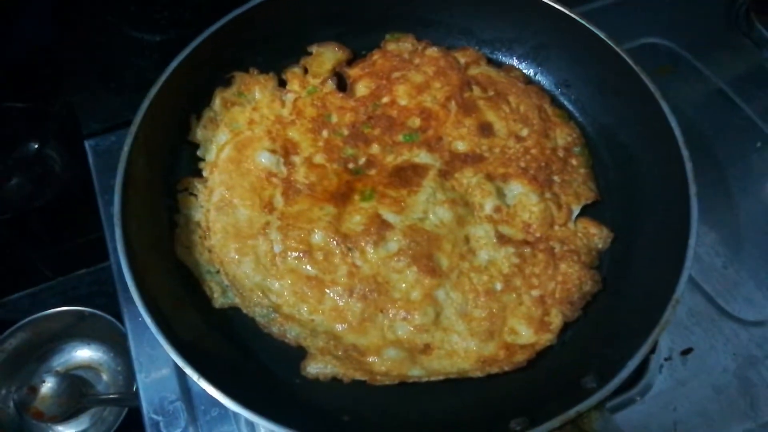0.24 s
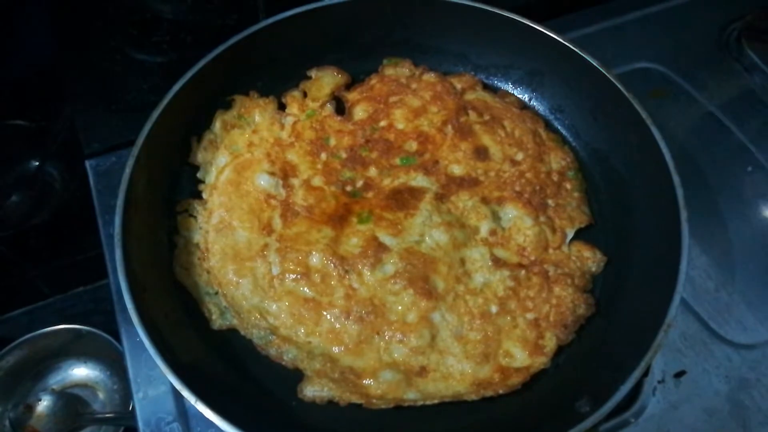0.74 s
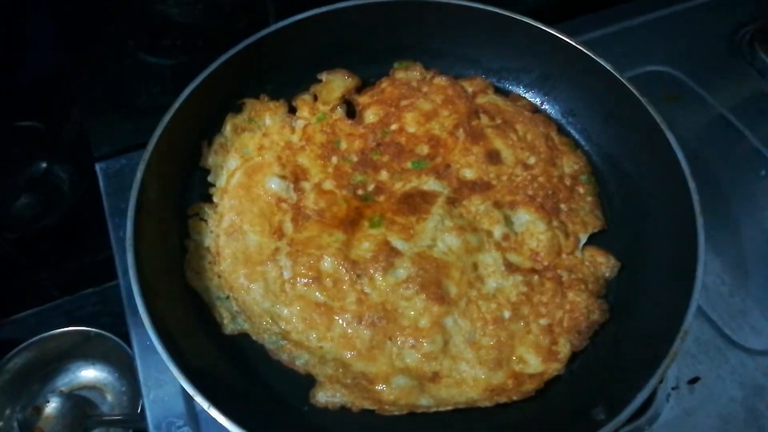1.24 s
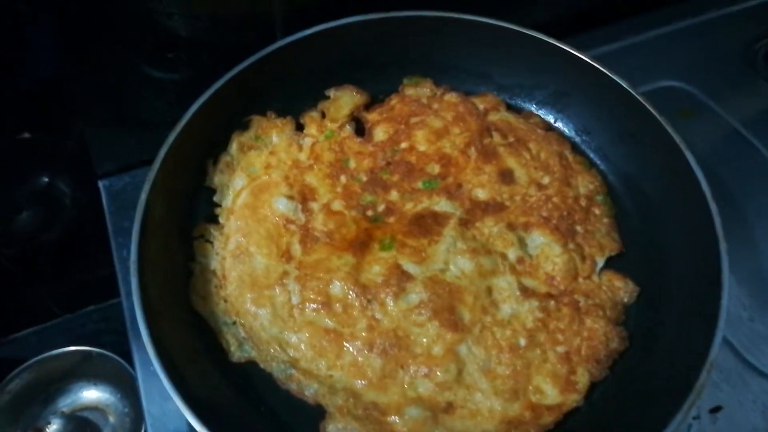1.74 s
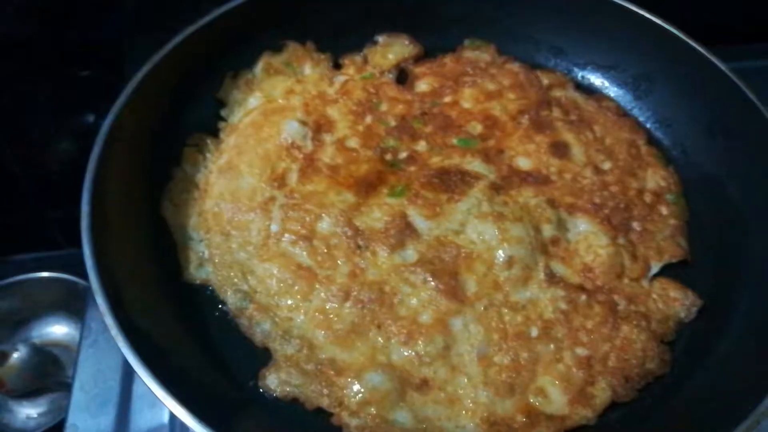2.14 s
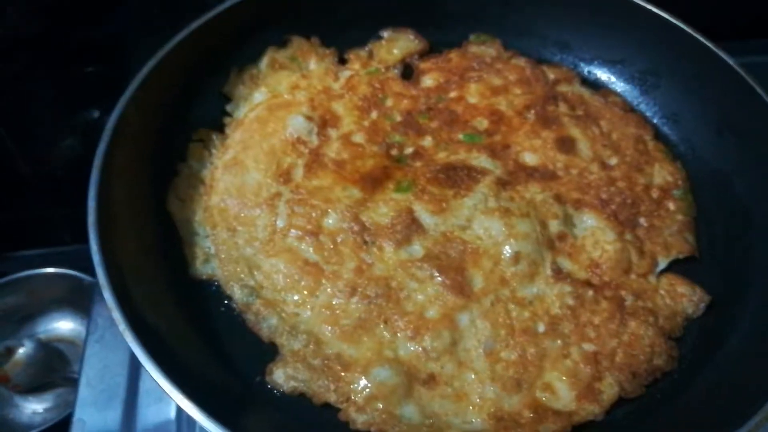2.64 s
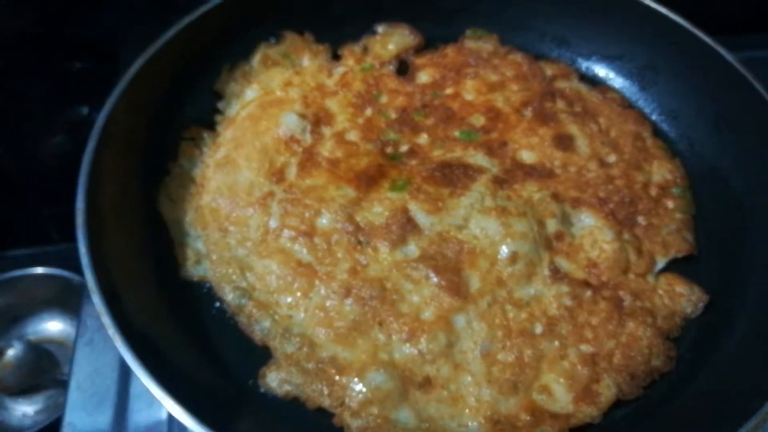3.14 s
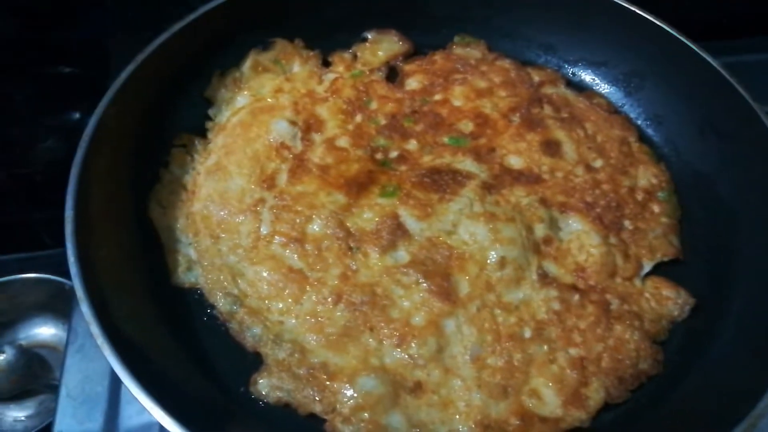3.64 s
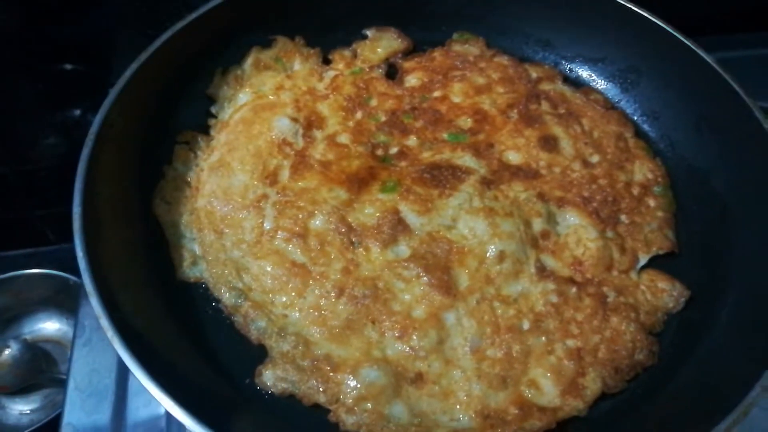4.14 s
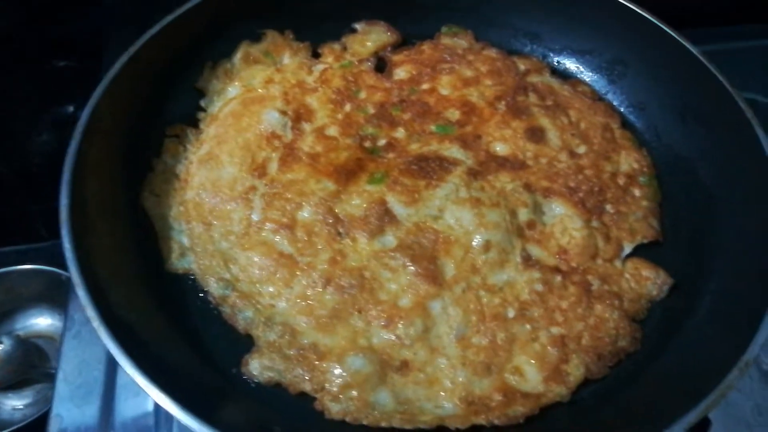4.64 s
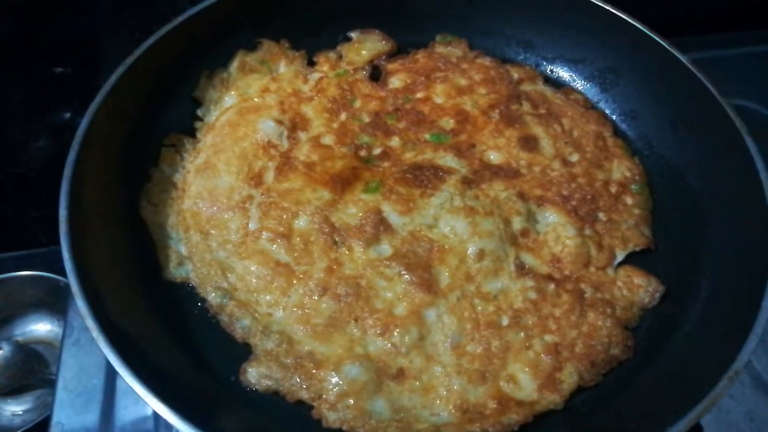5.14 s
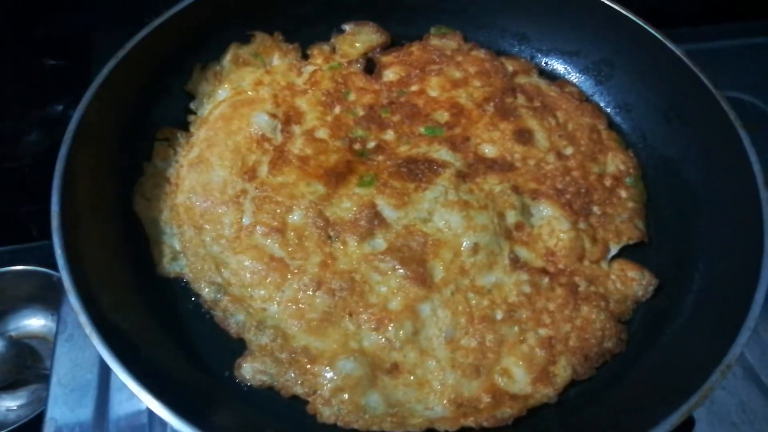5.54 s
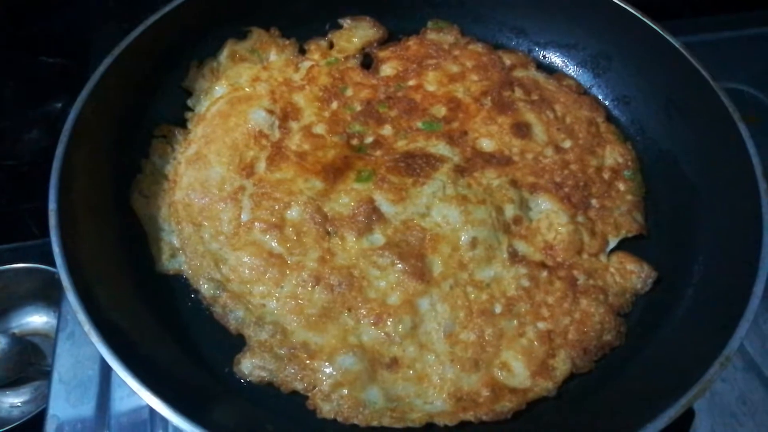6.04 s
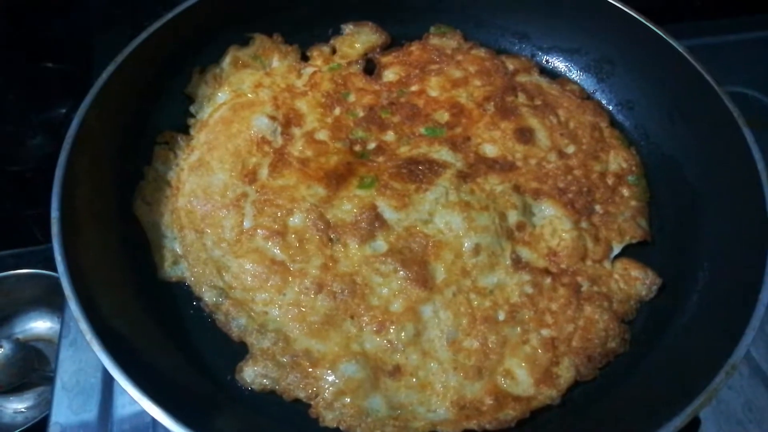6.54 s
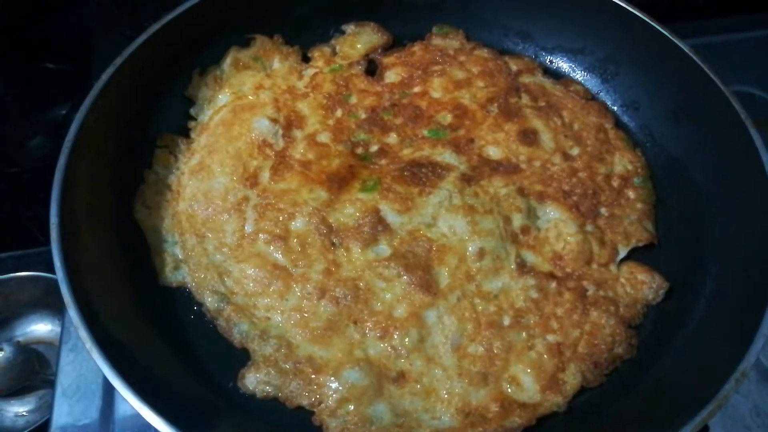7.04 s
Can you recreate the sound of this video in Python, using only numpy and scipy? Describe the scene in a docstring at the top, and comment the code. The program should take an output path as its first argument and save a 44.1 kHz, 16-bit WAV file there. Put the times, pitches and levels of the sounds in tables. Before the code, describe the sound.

An omelette sizzles and crackles steadily in hot oil, with an early metallic pan knock, sharp oil pops and later handling bumps.

```python
"""An omelette sizzles and pops in a pan of oil, close to a hand-held phone with two microphone ports. The
sizzle is noise plus random clicks; each pop is one sharp swing of pressure and a short splash. A hand over the
right port colours the sizzle with changing resonances and a gliding notch. Early on another pan nearby knocks
and grates on the stove, as ringing modes and noise. Later the fingers rub and bump the case, as shaped noise
and short low swings. Under it all lies a low rumble."""
import sys
import numpy as np
from scipy import signal
from scipy.fft import rfft, irfft
from scipy.io import wavfile

SR = 44100
rng = np.random.default_rng(int(sys.argv[2]) if len(sys.argv) > 2 else 0)


def unload_wav(signal):
    """Save mono or channel-first audio to the path in sys.argv[1] as 16-bit WAV at rate SR, clipped to [-1, 1]."""
    wavfile.write(
        sys.argv[1],
        SR,
        np.round(np.clip(np.atleast_2d(signal).T, -1, 1) * 32767).astype(np.int16),
    )


N = 321475
TIME = np.arange(N) / SR  # s

# fingers slide on the case: (start [s], length [s], level [dB])
RUBS = [(1.083, 0.094, -61), (1.38, 0.095, -73), (1.725, 0.15, -73), (2.264, 0.074, -59),
        (2.437, 0.057, -59), (3.124, 0.11, -57), (4.547, 0.077, -46), (4.588, 0.012, -39),
        (4.593, 0.059, -46.5), (4.614, 0.12, -47.5), (4.736, 0.19, -57)]

# ways the hand lies over the right port:
# (leak [dB], sharpness Q, five resonances of its hollow as (frequency [Hz], level [dB]))
LOOSE = (-3, 1.17, [(1390, -6), (4280, 5), (7600, 8.5), (10500, -10), (14500, 8)])
HOVERING = (-1.3, 1.06, [(1750, 4), (4600, 0), (5700, 9), (10800, 13.5), (15200, 8)])
CLOSING = (0.59, 1.67, [(1880, 7.5), (4600, 7.5), (6800, 3.5), (10000, 6), (14900, 17)])
CUPPED = (2.2, 2.25, [(2110, 6.7), (3400, 19.27), (8350, 21.07), (11400, 11.6), (14000, 4.8)])
PRESSED = (-6.5, 2.33, [(1400, -17), (1750, -29), (5250, 3.5), (7700, 5.5), (14000, 9.5)])
NARROWED = (0.5, 2, [(2000, 9.5), (3100, 7.5), (6650, 10), (9000, -1), (13600, 12)])
SQUEEZED = (2.7, 1.44, [(1920, 5.8), (3290, 15.5), (8300, 21), (11800, 23), (14000, 26)])
LIFTED = (-.5, 2.23, [(1800, 9), (3370, 15), (7950, -5), (11700, -4.5), (14000, -26)])
OPEN = (-2.5, 2.87, [(1980, -11.5), (3370, 4), (7750, -9.5), (11400, -6), (14000, -18)])


def fizz(hiss_db=-1.0, crackle_db=-4.5, per_s=1100, spread_db=4.5, largest=4.43,
         flutter_db=0.65, swell_db=.5, wet_db=-5):
    """Countless tiny bubbles merge to a hiss; larger ones crackle out of it in spurts."""
    # how hard the oil boils: (time [s], level [dB])
    boil = [(0, -51), (1.7, -48.5), (2.7, -51), (3.6, -51), (5.5, -52.5), (7.29, -52.5)]
    # the oil spits on after a big bubble: (time [s], lift [dB], decay [s])
    spits = [(6.322, 1.5, 0.026), (6.977, 5.5, 0.044)]
    spit_db = sum(db * np.exp(-abs(TIME - s) / decay) * (TIME > s) for s, db, decay in spits)
    spurts = gain_of(flutter_db * drift(20) + swell_db * drift(4.3) + spit_db)

    size_db = spread_db * np.minimum(rng.exponential(1, N), largest)
    size = gain_of(size_db) * rng.choice([-1, 1], N)
    clicks = size * (rng.random(N) < per_s / SR)
    # each bubble lies somewhere else in the pan, so its delay between the ports differs
    place = rng.integers(0, 16, N)
    other = np.bincount((np.arange(N) + place - 8) % N, clicks, N)
    crackle = evened(np.array([clicks, other]))
    crackle = crackle + gain_of(wet_db) * room(crackle)

    hiss = rng.standard_normal((2, N))
    bubbles = gain_of(hiss_db) * hiss + gain_of(crackle_db) * crackle
    return gain_of(follow(boil, TIME)[0]) * spurts * bubbles


def pops(level_db=1.5, q=0.89, splash_db=2, splash_s=0.0016, snap=0.53, usual_db=-22,
         low_hz=1600, wet_db=-7.0, size=512):
    """A bubble bursts in one sharp swing of pressure, then its film breaks up for a few ms."""
    # the loudest bursting bubbles: (time [s], relative strength [dB], centre [Hz])
    big_pops = [(.907, -19.5, 9200), (1.1437, -22, 6500), (1.3652, -21, 13000), (1.4933, -18, 14500),
                (1.608, -18.5, 15100), (1.7404, -20.5, 13000), (1.9177, -17.5, 9000), (2.0698, -4.5, 14300),
                (2.1748, -19, 9000), (2.1854, -23, 13000), (2.2507, -21.5, 11100), (2.2922, -24, 4540),
                (2.3358, -18, 12000), (2.4153, -20, 10000), (2.4369, -16.5, 3750), (2.441, -13.5, 3800),
                (2.6628, -20.5, 12100), (2.6896, -20, 13100), (2.7156, -17.5, 11500), (2.8616, -17, 13100),
                (2.9045, -14, 13400), (2.9425, -21.5, 12000), (3.0164, -19, 13100), (3.1803, -16.5, 13000),
                (3.2652, -24, 9000), (3.4318, -18.5, 12000), (3.9146, -20.5, 9000), (4.1164, -13.5, 3200),
                (4.3798, -19.5, 9100), (4.451, -15, 13000), (5.832, -18.5, 13000), (6.2744, -22.5, 6500),
                (6.318, -9.5, 9600), (6.358, -19.5, 6500), (6.9762, -7.5, 2870), (7.021, -17, 3400)]
    out = np.zeros((2, N))
    hz = np.fft.rfftfreq(size, 1 / SR)
    t = np.arange(size) / SR
    for s, db, centre_hz in big_pops + small_pops():
        w = 1j * hz / centre_hz
        swing = w / (q * (1 + w * w) + w)
        burst = swing * 1j * hz / (low_hz + 1j * hz)  # too small to radiate bass
        splash = gain_of(splash_db - snap * max(db - usual_db, 0))  # big bubbles snap more cleanly
        for port in out:
            scatter = rng.standard_normal(size) * np.exp(-t / splash_s)
            scatter = scatter / np.linalg.norm(scatter)
            paths = (1 + splash * rfft(scatter)) / np.hypot(1, splash)
            pop = irfft(paths * burst)[:size // 2]
            add(port, s, -gain_of(db + level_db) * pop)
    return out + gain_of(wet_db) * room(out)


def small_pops(count=58, crowded=24):
    """Small bubbles burst at random, some crowded into one flurry: (time, strength, centre) rows."""
    strength_db, spread_db = -24, 2.4  # relative, like the strengths of the big pops
    centre_hz, octaves = 10700, 0.66  # octaves to either side
    flurry_s, flurry_width_s = 2.3, .6
    when, pitch = rng.random((count, 2)).T
    crowd, strength = rng.standard_normal((count, 2)).T
    in_flurry = np.arange(count) < crowded
    s = np.where(in_flurry, flurry_s + flurry_width_s * crowd, when * N / SR)
    db = strength_db + spread_db * np.tanh(strength)
    hz = centre_hz * 2 ** (octaves * (2 * pitch - 1))
    return list(zip(s, db, hz))


def cupped(x, leak_hz=6000, steepness=7, flex_hz=2500):
    """Sound leaks past the hand and rings in its hollow; the palm notches and shades it."""
    # the hand flexes within a grip, so its hollow rings more or less:
    # (time [s], half length [s], change [dB])
    flexes = [(0.665, 0.097, -4), (.92, 0.042, -0.5), (1.543, 0.035, 6.5), (2.547, 0.21, -1),
              (3.18, 0.054, 0.5), (3.604, 0.048, 3), (3.732, 0.046, -6.5), (3.923, 0.031, 2.5),
              (4.113, 0.038, 2.5), (4.27, 0.064, -5), (4.56, .025, -2.5)]
    # the hovering palm reflects the sizzle and cancels it in a gliding notch:
    # (time [s], frequency [Hz], depth [dB])
    notch = [(.7, 2700, -1), (.85, 2930, 11), (1.05, 3430, 27), (1.22, 3600, 19), (1.45, 4260, 15),
             (1.6, 4730, 4), (1.85, 4800, 5)]
    # dips of this reflection: (multiple of the notch, width in the same unit, share of its depth)
    dip_rows = [(1, 0.23, 0.66), (2.48, 0.3, 0.49), (2.85, 0.15, 0.37), (3.85, 0.43, 0.4)]
    # the cupped palm shades the highest treble: (time [s], corner [Hz])
    shade_rows = [(1.85, 21000), (1.9, 15300), (2.2, 15000), (2.42, 12700), (3.1, 13930), (3.3, 15200),
                  (3.45, 21000)]
    hz, t, z = signal.stft(x, SR, nperseg=512, noverlap=384)
    hz = hz[:, None] + 1  # 1 Hz up, to avoid dividing by zero

    leak_db, q, *modes = grip(t)
    flex_db = sum(db * swell(t, s, half) for s, half, db in flexes)
    flex_db = flex_db * hz / (hz + flex_hz)  # mostly in the treble
    power = gain_of(leak_db) ** 2 / (1 + (hz / leak_hz) ** 2)
    for mode_hz, db in zip(modes[::2], modes[1::2]):
        detuning = q * (hz / mode_hz - mode_hz / hz)
        power = power + (gain_of(db + flex_db) / (1 + detuning ** 2)) ** 2

    notch_hz, depth_db = follow(notch, t)
    order = hz / notch_hz
    dips = sum(share * swell(order, multiple, width) for multiple, width, share in dip_rows)
    shade = np.hypot(1, (hz / follow(shade_rows, t)[0]) ** steepness)
    heard = z * np.sqrt(power) * gain_of(-depth_db * dips) / shade
    return signal.istft(heard, SR, nperseg=512, noverlap=384)[1][:N]


def grip(t):
    """Leak, sharpness and resonances of the hand: each grip is held, then glides into the next."""
    # the hand changes its grip: (start [s], duration [s], new grip)
    moves = [(.66, 0.22, HOVERING), (1.245, 0.68, CLOSING), (1.87, 0.0094, CUPPED), (3.26, 0.12, NARROWED),
             (3.432, 0.16, PRESSED), (4.388, .12, NARROWED), (4.513, 0.041, SQUEEZED), (4.561, 0.1, LIFTED),
             (5.01, 0.41, OPEN)]

    def column(leak_db, q, modes):
        """One grip as a column of numbers."""
        return np.r_[leak_db, q, np.ravel(modes)][:, None]

    state = column(*LOOSE)
    for s, duration, new in moves:
        progress = np.clip((t - s) / duration, 0, 1)
        state = state + progress * (column(*new) - state)
    return state


def pan_shift(clatter_db=0, sing_db=-8, slips_per_s=1200, wet_db=-5, rise_s=0.0051):
    """Another pan nearby knocks while it slips in small jerks over the stove; both ring its modes."""
    # ringing modes of the pan: (frequency [Hz], relative level [dB], time to fall 60 dB [s])
    pan = [(152, -10, 0.25), (290, -7.5, 0.27), (296.7, 0, 0.27), (398, -21, 0.36), (487, -24, 0.31),
           (596, -14.5, .15), (720, -8, 0.11), (751, -9, 0.21), (774, -5.5, 0.12), (827, 5, 0.039),
           (945, -0.5, 0.06), (1183, -13.5, 0.11), (1570, -21, 0.25), (1575, -27, 0.21)]
    # the pan's blows: (time [s], level [dB])
    knocks = [(0.159, -41.5), (0.188, -36), (.229, -29.5), (.258, -35.5), (0.288, -42.5), (0.33, -44.5)]
    # how strongly the pan grates: (time [s], level [dB])
    grating = [(.155, -88), (.165, -58), (.22, -51), (.232, -39.5), (.255, -43.5), (.295, -40),
               (.33, -43.5), (.38, -69), (.43, -90), (.5, -102)]
    # the dull clatter of the stove top: (frequency [Hz], relative level [dB])
    clatter_colour = [(50, -3), (150, -1.5), (220, -8), (310, 11), (500, -7), (750, -0.5), (950, 0),
                      (1080, -7.5), (1500, -5), (2000, -18), (3100, -12.5), (5000, -17.5), (12000, -36)]
    # the heaviest blow leaves the stove's metal humming:
    # (time [s], level [dB], frequency [Hz], time to fall 60 dB [s])
    stove_hum = (.229, -39, 331, .78)
    t = TIME[:SR]
    body = sum(gain_of(db - 60 * t / t60) * np.sin(2 * np.pi * hz * t) for hz, db, t60 in pan)
    body = body * (1 - np.exp(-t / rise_s))  # the heavy pan takes a moment to swing up

    blows = np.zeros(N)
    for s, db in knocks:
        add(blows, s, gain_of([db]))
    slips = evened(rng.standard_normal(N) * (rng.random(N) < slips_per_s / SR))
    force = gain_of(follow(grating, TIME)[0]) * (TIME < grating[-1][0])
    clatter = gain_of(clatter_db) * evened(colour(slips, clatter_colour)[0]) * force
    jerks = gain_of(sing_db) * slips * force / np.linalg.norm(body)
    sing = ring(blows + jerks, body)[0]

    s, db, hz, t60 = stove_hum
    hum = np.zeros(N)
    add(hum, s, gain_of(db - 60 * t / t60) * np.sin(2 * np.pi * hz * t))
    return sing + hum + clatter + gain_of(wet_db) * room(clatter + sing / 2)


def fingers(left_db=-2, grip_db=0.0):
    """Soft pushes on the case, and skin that sticks and slips over it."""
    # fingers bump the case: (time [s], level [dB], centre [Hz])
    bumps = [(3.925, -60, 40), (4.29, -59.5, 45), (4.536, -50, 80), (4.568, -42, 130), (4.582, -39.5, 116),
             (4.595, -38, 97), (4.619, -40, 149), (4.757, -50, 111), (4.811, -43.5, 65), (4.869, -52, 610),
             (4.8735, -35, 915), (4.876, -40.5, 98)]
    # colour of the rubbing: (frequency [Hz], relative level [dB])
    rub_colour = [(30, 10), (100, 6), (200, 1.5), (350, 0), (520, -8.5), (850, 6.5), (1500, -12),
                  (3000, -20), (10000, -48)]
    out = np.zeros(N)
    t = TIME[:SR // 10]
    for s, db, hz in bumps:
        u = 2 * np.pi * hz * t
        add(out, s, gain_of(db) * np.sin(u) * np.exp(1 - u / 4.7))

    rough = rng.standard_normal(N) * gain_of(grip_db * drift(80))
    skin = evened(colour(rough, rub_colour)[0])
    for s, length, db in RUBS:
        stroke = skin[round(s * SR):][:round(length * SR)]
        add(out, s, gain_of(db) * stroke * signal.windows.tukey(len(stroke), .5))
    return left_late(out) * gain_of([[left_db], [0]])


def rumble(apart_db=-18, level_db=-66, unsteady_db=6, settle_s=0.96, stir_db=2.5, stir_s=0.11,
           light_db=-67, wander_db=2.34):
    """Low noise of kitchen and grip, alike at both ports; it settles, and stirs at firm rubs."""
    # colour of the rumble: (frequency [Hz], relative level [dB])
    rumble_colour = [(15, -0.5), (35, 4), (60, -5.5), (95, 0), (140, -10), (200, -19.5), (290, -13),
                     (450, -37), (1000, -41), (4000, -67)]
    noise = rng.standard_normal(N) + gain_of(apart_db) * rng.standard_normal((2, N))
    strokes = []
    for s, length, db in RUBS:
        firmness = np.clip((db - light_db) / 10, 0, 1)
        strokes.append(firmness * swell(TIME, s + length / 2, stir_s))
    sliding = np.max(strokes, axis=0)
    db = level_db + unsteady_db * np.exp(-TIME / settle_s)
    db = db + stir_db * sliding + wander_db * drift(1.4)
    return gain_of(db) * evened(colour(noise, rumble_colour))


def room(x, size=16384):
    """The diffuse tail of the kitchen, different at each port: noise whose treble dies sooner."""
    # decay of the kitchen: (frequency [Hz], time to fall 60 dB [s])
    kitchen = [(200, 0.46), (2000, 0.27), (8000, 0.13), (16000, 0.022)]
    hz, t, z = signal.stft(rng.standard_normal((2, size)), SR, nperseg=256)
    fading = gain_of(-60 * t / read(kitchen, hz)[:, None])
    tail = signal.istft(z * fading, SR, nperseg=256)[1]
    return ring(x, tail / np.linalg.norm(tail[0]))


def left_late(x, count=26):
    """The sound reaches the right port first, and the left one count samples later."""
    return np.array([np.r_[np.zeros(count), x[:-count]], x])


def gain_of(db):
    """Decibels to gain."""
    return 10 ** (np.asarray(db) / 20)


def evened(x):
    """Scales to rms 1."""
    return x / np.sqrt(np.mean(x ** 2) + 1e-20)


def read(points, hz):
    """Reads a spectrum table on a log-frequency axis."""
    f, value = np.transpose(points)
    return np.interp(np.log(hz + 1), np.log(f + 1), value)


def follow(rows, t):
    """The columns of a curve table at the times t."""
    s, *columns = np.transpose(rows)
    return [np.interp(t, s, c) for c in columns]


def swell(x, centre, half_width):
    """A smooth rise and fall around a centre."""
    return np.exp(-((x - centre) / half_width) ** 2)


def drift(hz):
    """Slow random wandering of rms 1, mostly below hz."""
    slowness = 1 + (np.fft.rfftfreq(N, 1 / SR) / hz) ** 2
    return evened(irfft(rfft(rng.standard_normal(N)) / slowness, N))


def add(mix, s, sound):
    """Mixes a sound in at time s."""
    part = mix[max(round(s * SR), 0):][:len(sound)]
    part += sound[:len(part)]


def ring(x, response):
    """Convolves one or two channels with a response."""
    return signal.fftconvolve(np.atleast_2d(x), np.atleast_2d(response), axes=1)[:, :N]


def colour(x, points, size=8192):
    """Filters with the given spectrum, so that nothing sounds ahead of its cause."""
    log_gain = np.log(gain_of(read(points, abs(np.fft.fftfreq(size, 1 / SR)))))
    spectrum = np.exp(signal.hilbert(log_gain).conj())  # minimum phase
    return ring(x, np.fft.ifft(spectrum).real[:size // 2])


def scene():
    """The frying reaches one open port and one under the hand; the other sounds are added."""
    # colour of the frying: (frequency [Hz], relative level [dB])
    fry_colour = [(200, -10.5), (600, -13), (950, -7.5), (1170, -2), (1350, 1.4), (1600, -3.5), (1850, 0),
                  (2300, -3.5), (4000, -3), (8000, -1.5), (16000, -6)]
    # colour of the open left port: (frequency [Hz], relative level [dB])
    left_port = [(1000, -0.5), (2500, -4), (4200, 2), (6500, -3), (8000, -3.5), (9500, -6), (12000, -10.5),
                 (15500, -9.5)]
    left, right = colour(fizz() + pops(), fry_colour)
    frying = np.array([colour(left, left_port)[0], cupped(right)])
    return frying + pan_shift() + fingers() + rumble()


def record(dry):
    """The input rounds off the highest peaks a little; then a low-pass sets the band limit."""
    ceiling, edge_hz = .75, 15900
    rounded = ceiling * np.tanh(dry / ceiling)
    low_pass = signal.firwin(511, edge_hz, window=("kaiser", 9), fs=SR)
    return signal.oaconvolve(rounded, low_pass[None], "same")


dry = scene()
out = record(dry)
unload_wav(out)
```